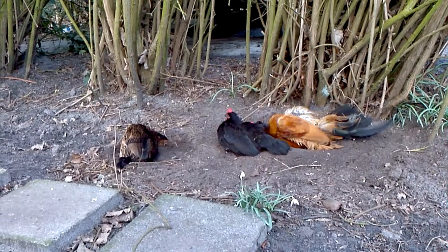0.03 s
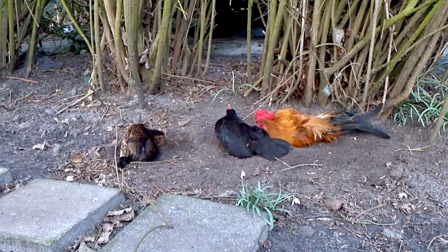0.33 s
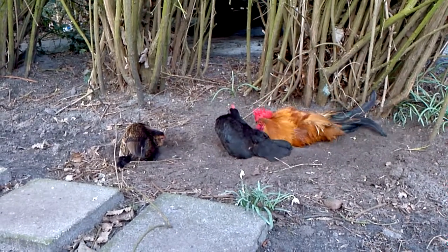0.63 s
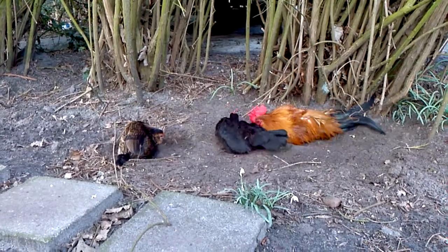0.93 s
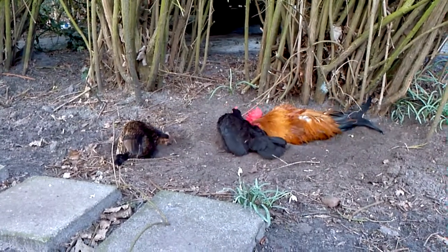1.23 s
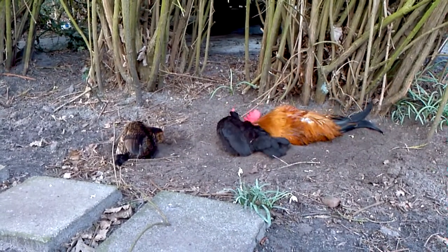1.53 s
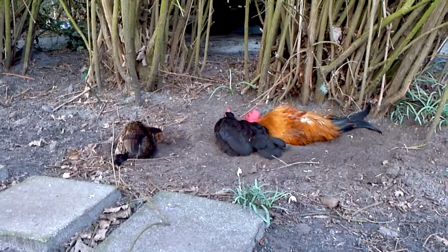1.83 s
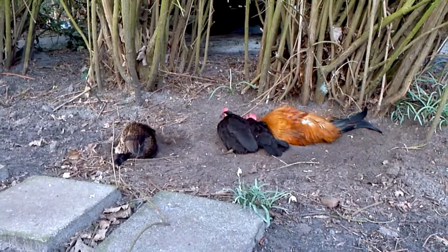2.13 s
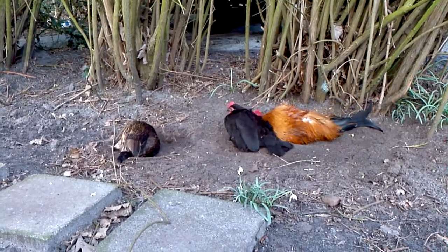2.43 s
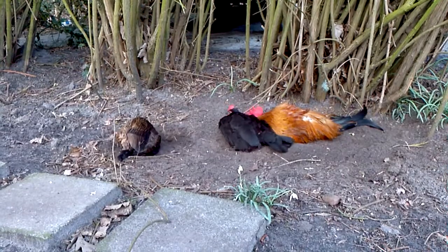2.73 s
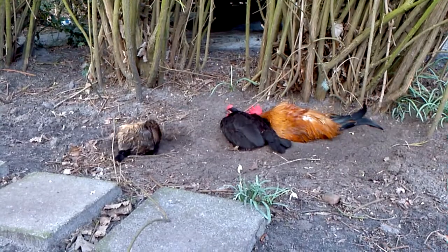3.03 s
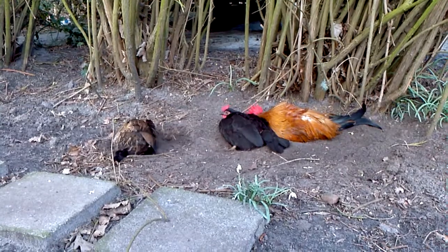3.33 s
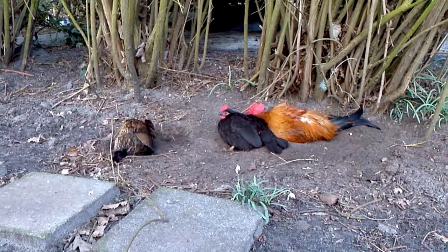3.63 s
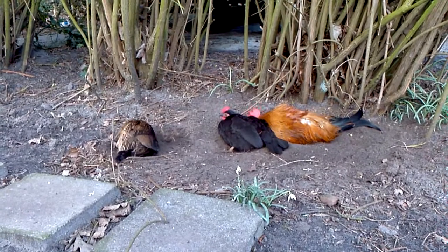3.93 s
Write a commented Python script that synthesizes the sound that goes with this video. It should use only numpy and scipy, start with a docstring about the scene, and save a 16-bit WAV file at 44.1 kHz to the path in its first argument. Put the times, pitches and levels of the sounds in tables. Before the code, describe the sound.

Chickens take a dust bath, their wings and bodies thumping dully in dry soil as feathers rustle. A small bird gives a buzzy call, the chickens settle to soft shuffling, and a few chirps follow over faint garden hiss.

```python
"""Chickens take a dust bath in dry soil beside a thicket, over garden hiss and faint far tones.
For the first second wings and bodies beat the ground in dull thumps, feathers rub and rustle,
a small bird chips and a claw scratches. Near 1.4 s the bird gives one buzzy call and chips again.
From 2 s the chickens settle to soft thumps and shuffling, with one more scratch and a twig's tick.
Three louder chips come near the end."""
import sys
import numpy as np
from scipy import signal
from scipy.fft import rfft, irfft
from scipy.io import wavfile

SR = 44100
rng = np.random.default_rng(int(sys.argv[2]) if len(sys.argv) > 2 else 0)


def wav_record(signal):
    """Record a signal, one row per channel, as 16-bit PCM in the file named by sys.argv[1]."""
    frames = np.transpose(np.atleast_2d(signal))
    bounded = np.clip(frames, -1, 1)
    # unit amplitude maps onto the largest positive 16-bit level
    quanta = np.round(bounded * 32767).astype(np.int16)
    wavfile.write(sys.argv[1], SR, quanta)


N = 176400
T = np.arange(N) / SR


def from_db(db):
    """Decibels to gain."""
    return 10 ** (np.asarray(db) / 20)


def unit_rms(x):
    """Scale to rms 1."""
    return x / np.sqrt(np.mean(x ** 2) + 1e-20)


def curves(rows):
    """Interpolate each column after t/s to one value per sample."""
    times, *columns = np.transpose(rows)
    return [np.interp(T, times, column) for column in columns]


def coloured(x, spectrum):
    """Filter by (f/Hz, level/dB) points; rms 1."""
    hz, db = np.transpose(spectrum)
    bins_hz = np.maximum(np.arange(N // 2 + 1) * SR / N, 1)
    gain = from_db(np.interp(np.log(bins_hz), np.log(hz), db))
    return unit_rms(irfft(rfft(x) * gain, N))


def drift(rate_hz):
    """Low-passed random wander; rms 1."""
    bins_hz = np.arange(N // 2 + 1) * SR / N
    return unit_rms(irfft(rfft(rng.standard_normal(N)) / (1 + (bins_hz / rate_hz) ** 2) ** 2, N))


def cut(x, hz, kind, order=2):
    """Butterworth high- or low-pass."""
    return signal.sosfilt(signal.butter(order, hz, kind, fs=SR, output="sos"), x)


def grains(per_s, spread_db=5):
    """Random clicks of uneven size."""
    sizes = from_db(spread_db * np.minimum(rng.exponential(1, N), 4))
    signs = rng.choice([-1, 1], N)
    return sizes * signs * (rng.random(N) < per_s / SR)


def gate(start_s, end_s, fade_s):
    """Window with linear fades."""
    return np.clip(np.minimum(T - start_s, end_s - T) / fade_s, 0, 1)


# hiss spectrum: f/Hz, level/dB
HISS_SPECTRUM = [(25, -65.5), (50, -27.5), (75, -22.5), (130, -3.5), (180, -0.5), (270, -8.5), (420, -9.5),
                 (600, -12), (850, -12.5), (1130, -12), (1400, -17.5), (2000, -21.5), (2700, -24),
                 (4600, -28), (5500, -22.5), (6100, -24), (6550, -23), (7100, -30), (8000, -43.5),
                 (9000, -34)]
# hiss envelope: t/s, level/dB
HISS_ENVELOPE = [(0, -60.5), (1.3, -59), (2.3, -59.5), (3, -60.5), (4, -61)]

def garden_hiss(waver_db=1):
    """Steady outdoor noise, wavering slightly."""
    db, = curves(HISS_ENVELOPE)
    return from_db(db + waver_db * drift(3.1)) * coloured(rng.standard_normal(N), HISS_SPECTRUM)


# noise bands: start t/s, end t/s, f/Hz, width/Hz, level/dB
WHINES = [(-0.5, 5, 5266, 110, -79), (3.5, 4.2, 2147, 277, -76.5)]

def far_whines():
    """Faint, narrow bands of noise in the distance."""
    out = np.zeros(N)
    for start_s, end_s, hz, width_hz, db in WHINES:
        phase = 2 * np.pi * hz * T
        band = unit_rms(drift(width_hz) * np.cos(phase) + drift(width_hz) * np.sin(phase))
        out += from_db(db) * gate(start_s, end_s, fade_s=0.048) * band
    return out


# rubbing envelope: t/s, level/dB
SHUFFLE_ENVELOPE = [(0, -46.5), (.17, -53.5), (.27, -44.5), (.37, -60), (.42, -65.5), (.53, -59.5),
                    (.6, -52), (.68, -50.5), (.77, -60), (.83, -49.5), (.9, -60), (.99, -63), (1.05, -50),
                    (1.13, -66), (1.85, -67.5), (2.15, -62), (2.8, -69), (4, -73.5)]
# rubbing spectrum: f/Hz, level/dB
SHUFFLE_SPECTRUM = [(25, -46), (50, -26), (75, -9), (120, 1), (170, -2), (300, -16), (480, -23.5),
                    (800, -34.5), (1600, -69.5)]

def shuffling(rough_db=3):
    """Feathered bodies rub in the soil: low, lumpy noise."""
    db, = curves(SHUFFLE_ENVELOPE)
    return from_db(db + rough_db * drift(49)) * coloured(rng.standard_normal(N), SHUFFLE_SPECTRUM)


# feather strokes: centre t/s, level/dB, Gaussian sigma/s, centre f/Hz
RUSTLES = [(0.197, -70, 0.42, 1340), (0.322, -71, 0.21, 2600), (0.826, -68, 0.11, 728),
           (1.05, -67, 0.042, 645), (2.265, -77.5, 0.17, 1130)]

def rustling(edge_db=-35):
    """Feathers brush dry litter: swells of dense grains in a broad band."""
    out = np.zeros(N)
    for centre_s, db, sigma_s, hz in RUSTLES:
        swell = np.exp(-0.5 * ((T - centre_s) / sigma_s) ** 2)
        band = [(hz / 4, edge_db), (hz, 0), (hz * 4, edge_db)]
        out += from_db(db) * swell * coloured(grains(per_s=9000), band)
    return out


# wing and body beats: t/s, level/dB, f/Hz, rise/cycles
THUMPS = [(.036, -39, 148, 0.1), (0.05, -45, 153, 0.25), (0.068, -55, 166, 0.2), (0.0868, -45, 127, 0.49),
          (0.1147, -51, 148, .3), (0.15, -44, 209, 0.13), (0.164, -35, 145, 0.24), (0.19, -55, 130, 0.34),
          (0.221, -46, 175, 0.28), (0.234, -34.5, 250, 0.094), (0.2636, -24.5, 188, 0.38),
          (0.2827, -35.5, 176, 0.42), (0.3082, -42, 145, 0.43), (0.349, -46.5, 148, 0.4),
          (0.5445, -32.5, 210, 0.21), (0.564, -37.5, 124, 0.39), (.584, -29.5, 230, 0.58),
          (0.5969, -24, 270, 0.12), (0.6071, -33, 273, 0.18), (0.614, -27, 174, 0.56),
          (0.638, -31, 200, 0.4), (0.652, -24.5, 207, 0.12), (0.661, -35.5, 328, 0.29),
          (.667, -34, 200, 0.4), (.675, -36, 250, 0.17), (0.688, -37.5, 180, 0.28), (.701, -43, 150, .3),
          (0.71, -39, 140, 0.55), (0.738, -35, 162, .2), (.752, -38.5, 168, 0.6), (0.8038, -22, 167, 0.15),
          (0.8211, -32, 177, 0.98), (0.947, -45.5, 136, 0.32), (1.012, -40, 140, 0.24),
          (1.0201, -31, 182, 0.31), (1.028, -33, 252, 0.12), (1.037, -42, 190, 0.35),
          (1.054, -46.5, 157, .3), (1.0694, -27.5, 218, 0.3), (1.08, -41, 150, 0.43), (1.091, -53, 140, .3),
          (1.994, -48.5, 118, 0.3), (2.021, -52, 149, 0.38), (2.086, -47.5, 182, .2),
          (2.116, -45.5, 188, 0.32), (2.232, -51, 138, 0.3), (2.2783, -44.5, 122, 0.44),
          (2.5151, -38, 164, 0.18), (2.61, -51.5, 117, 0.7), (2.675, -44, 164, 0.22),
          (2.747, -50.5, 126, 0.73), (3.046, -50, 161, .5)]

def thumps(fall_cycles=0.39, gain_db=2):
    """Each beat on the ground is one heavily damped swing of air; quicker is higher and shorter."""
    out = np.zeros(N)
    for centre_s, db, hz, rise_cycles in THUMPS:
        near = np.abs(T - centre_s) < 0.06
        cycles = (T[near] - centre_s) * hz
        swell = 1 / (np.exp(-cycles / rise_cycles) + np.exp(cycles / fall_cycles))
        out[near] -= from_db(db + gain_db) * swell / swell.max() * np.sin(2 * np.pi * cycles)
    return cut(cut(out, 84, "high", order=3), 980, "low")


# held tones: start t/s, end t/s, f/Hz, level/dB
FAR_TONES = [(.1, .31, 1778, -71.5), (2.87, 3.28, 1676, -72), (3.76, 4.1, 2140, -73.5)]

def far_tones(wander_hz=8):
    """Thin distant tones fade in, hold a near-steady pitch and fade out."""
    out = np.zeros(N)
    for start_s, end_s, hz, db in FAR_TONES:
        phase = 2 * np.pi * np.cumsum(hz + wander_hz * drift(8.5)) / SR
        out += from_db(db) * gate(start_s, end_s, fade_s=0.089) * np.sin(phase)
    return out


# bird chips: start t/s, level/dB, length/s, first f/Hz, last f/Hz, bend (>1: fall speeds up)
CHIPS = [(0.181, -62, 0.021, 3845, 2960, 1.5), (.287, -66, .016, 3800, 3000, 1.5),
         (.378, -62, 0.018, 3900, 3030, 1.5), (1.594, -64, .018, 3450, 2850, 1.1),
         (1.661, -64, .017, 3800, 2800, 1.5), (1.73, -63.5, .02, 3850, 2700, 2.2),
         (2.54, -64.5, 0.0182, 3530, 2850, 1.3), (3.328, -55, .021, 3770, 2740, 0.515),
         (3.402, -57, 0.02, 3690, 2750, 1.6), (3.524, -58, 0.018, 3700, 2730, 1.54)]

def bird_chips():
    """Quick whistles that swell, fall along a bent glide and stop short."""
    out = np.zeros(N)
    for start_s, db, length_s, first_hz, last_hz, bend in CHIPS:
        near = (T > start_s) & (T < start_s + length_s)
        progress = (T[near] - start_s) / length_s
        hz = first_hz + (last_hz - first_hz) * progress ** bend
        swell = np.sqrt(progress * np.sin(np.pi * progress))
        out[near] += from_db(db) * swell / swell.max() * np.sin(2 * np.pi * np.cumsum(hz) / SR)
    return out


def thicket(x, tail_db, t60_s=0.29, ground_db=-5, ground_lag_s=0.00247):
    """A ground bounce makes gliding notes lumpy; stems and walls scatter a short, thin tail."""
    bounced = x + from_db(ground_db) * np.interp(T - ground_lag_s, T, x)
    t = T[:SR // 2]
    echoes = rng.standard_normal(len(t)) * from_db(-60 * t / t60_s)
    tail = signal.fftconvolve(bounced, echoes / np.linalg.norm(echoes))[:N]
    return bounced + from_db(tail_db) * tail


# claw strokes: start t/s, level/dB, decay/s
SCRATCHES = [(.5305, -60.5, .008), (2.1785, -58, .014)]
# soil grain spectrum: f/Hz, level/dB
SOIL_SPECTRUM = [(500, -15), (1500, -6), (3000, 2), (4500, -1), (6700, 5.5), (8000, -24)]

def scratching(attack_s=0.0011):
    """Claws rake dry soil: showers of grains that start at once and die away."""
    envelope = np.zeros(N)
    for start_s, db, decay_s in SCRATCHES:
        t = np.maximum(T - start_s, 0)
        envelope += from_db(db) * np.minimum(t / attack_s, 1) * np.exp(-t / decay_s)
    return envelope * coloured(grains(per_s=2900), SOIL_SPECTRUM)


# call contour: t/s, f/Hz, level/dB, trill depth/Hz
BUZZ = [(1.365, 2770, -77, 5), (1.388, 2830, -72, 20), (1.403, 2765, -83, 20), (1.414, 2850, -61, 33),
        (1.43, 3020, -65.5, 30), (1.445, 3410, -56.5, 89), (1.458, 3830, -60, 480), (1.48, 3960, -57, 480),
        (1.497, 3780, -57, 280), (1.52, 3710, -63.5, 230), (1.57, 3890, -75, 300), (1.6, 3930, -78, 280)]

def bird_buzz(trill_hz=155.8, trill_wander=0.089):
    """One rising note that breaks into a fast pitch trill."""
    hz, db, depth_hz = curves(BUZZ)
    rate_hz = trill_hz * (1 + trill_wander * drift(40))
    trill = np.sin(2 * np.pi * np.cumsum(rate_hz) / SR)
    sounding = (T > BUZZ[0][0]) & (T < BUZZ[-1][0])
    return from_db(db) * sounding * np.sin(2 * np.pi * np.cumsum(hz + depth_hz * trill) / SR)


# twig modes: f/Hz, relative level/dB, t60/s
TWIG_MODES = [(2700, -4, .004), (4450, -1, .008), (5600, -6, .003)]

def twig(start_s=2.193, level_db=-52):
    """A dry twig ticks under a claw and rings very briefly."""
    t = np.maximum(T - start_s, 0)
    out = np.zeros(N)
    for hz, db, t60_s in TWIG_MODES:
        decay_db = 60 * np.minimum(t / t60_s, 3)
        out += from_db(level_db + db - decay_db) * np.sin(2 * np.pi * hz * t)
    return out


def scene():
    """Garden, chickens and bird in mono."""
    garden = garden_hiss() + far_whines() + far_tones()
    chickens = shuffling() + rustling() + thumps() + scratching() + twig()
    bird = thicket(bird_chips(), tail_db=-8) + thicket(bird_buzz(), tail_db=-5)
    return (garden + chickens + bird)[None]


def record(dry, highpass_hz=30, stopband_hz=8823.36):
    """Band limit: drop the deepest bass and the top treble."""
    lowpass = signal.cheby2(12, 40, stopband_hz, fs=SR, output="sos")
    return signal.sosfilt(lowpass, cut(dry, highpass_hz, "high"))


dry = scene()
out = record(dry)
wav_record(out)
```